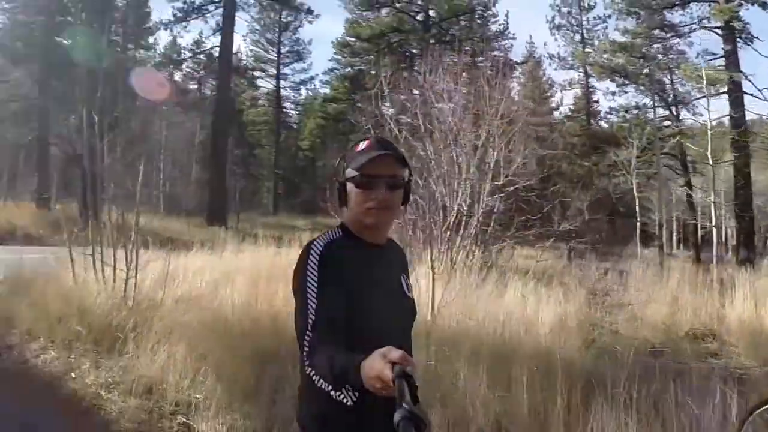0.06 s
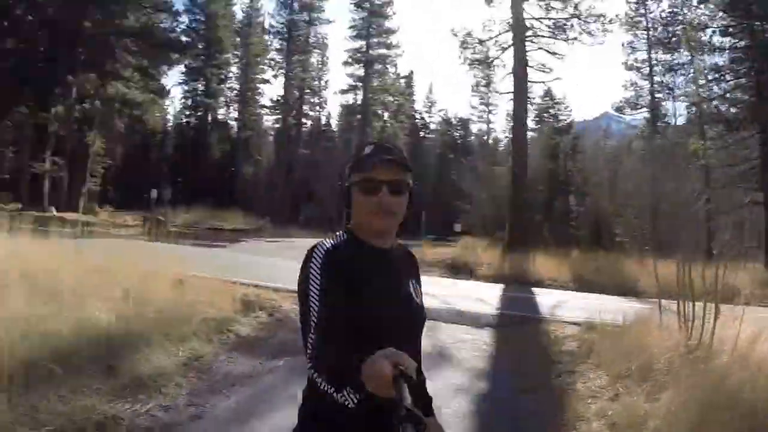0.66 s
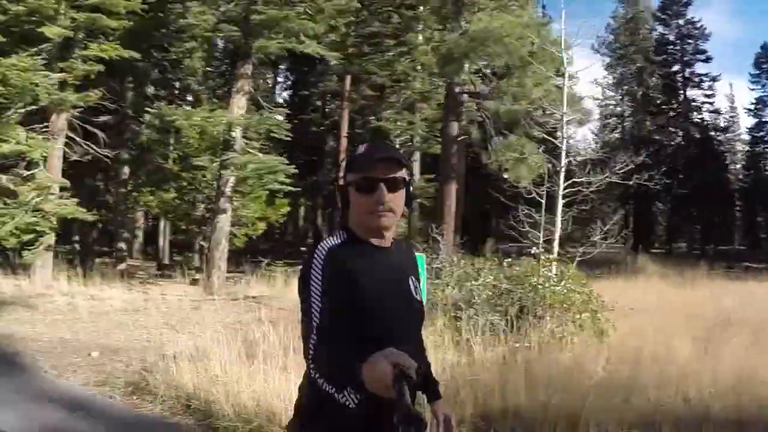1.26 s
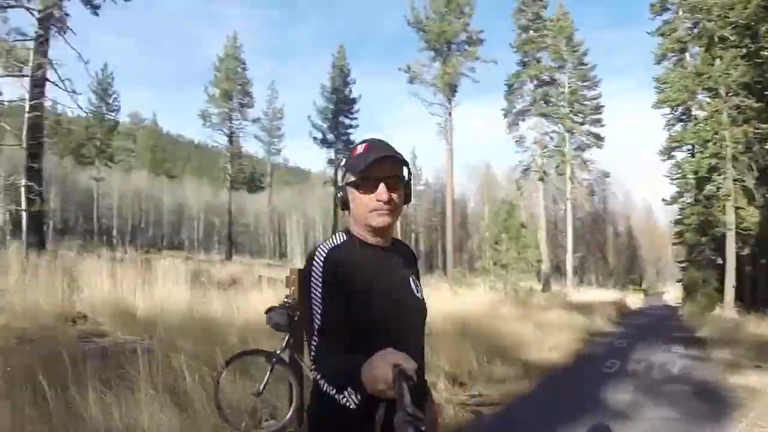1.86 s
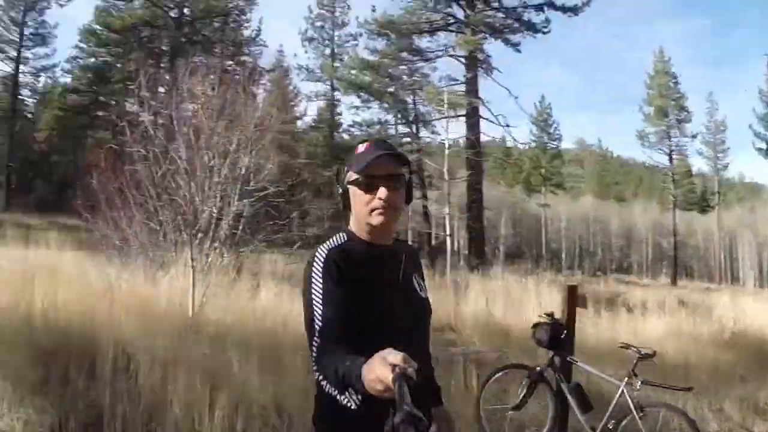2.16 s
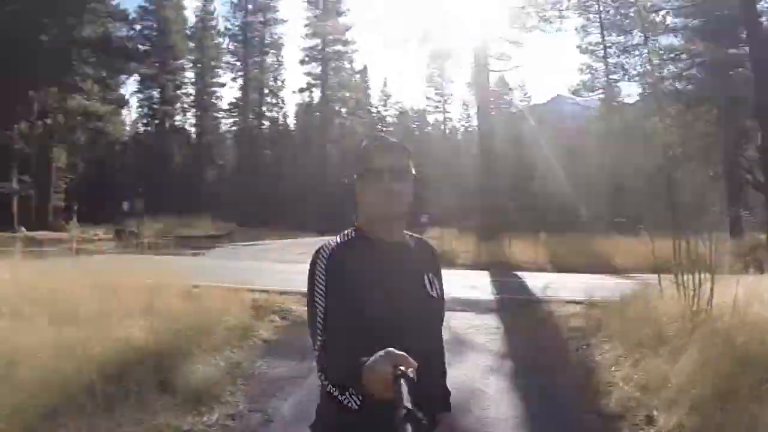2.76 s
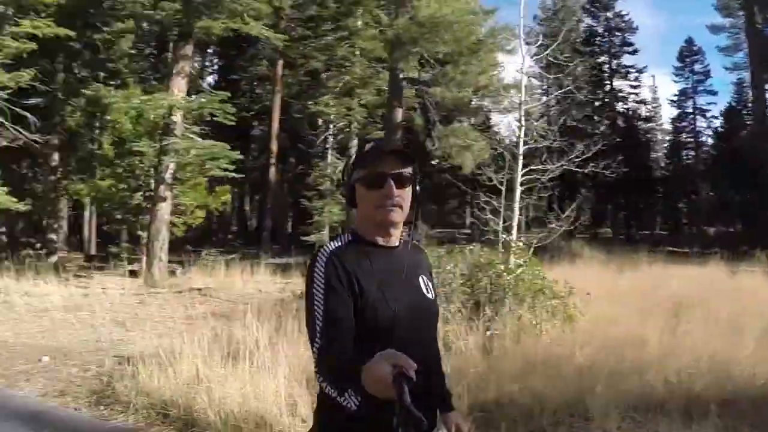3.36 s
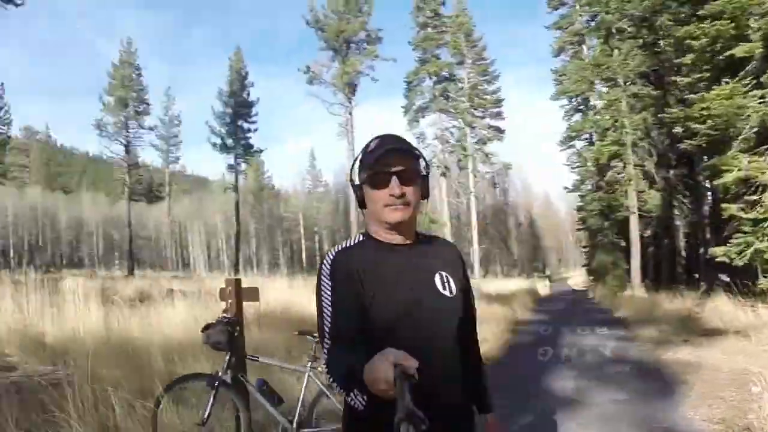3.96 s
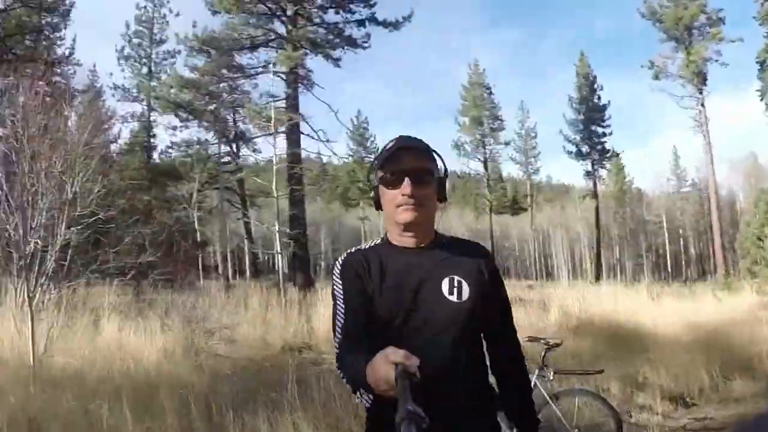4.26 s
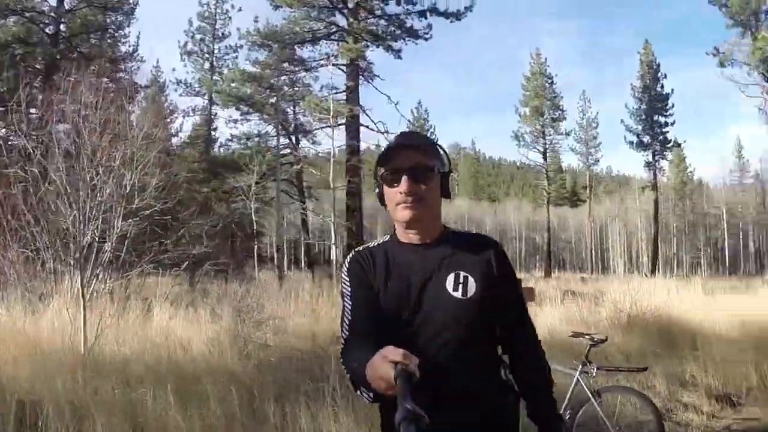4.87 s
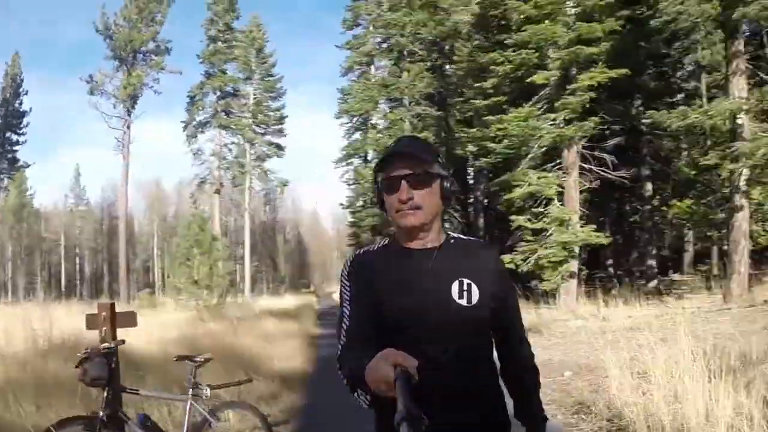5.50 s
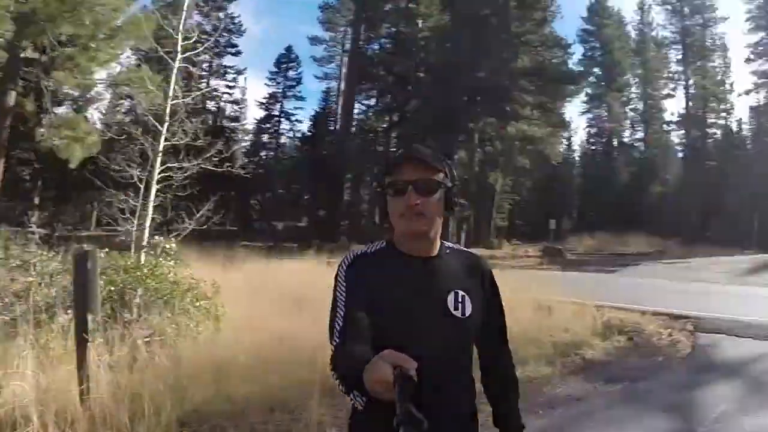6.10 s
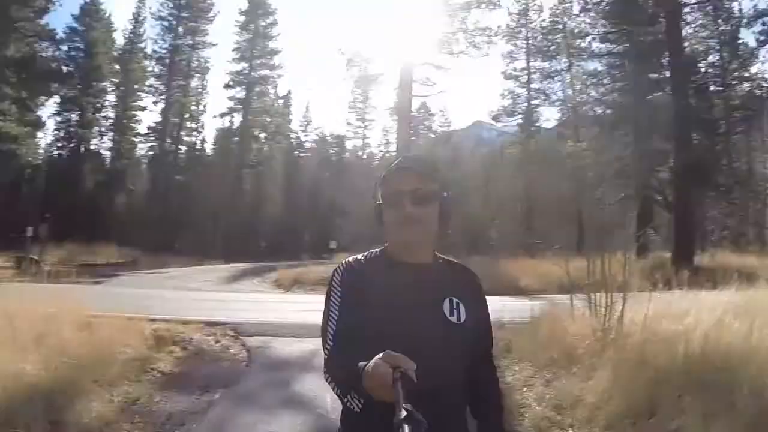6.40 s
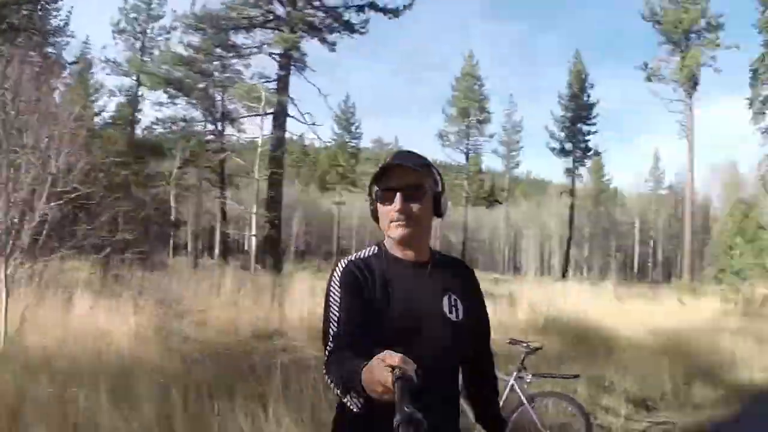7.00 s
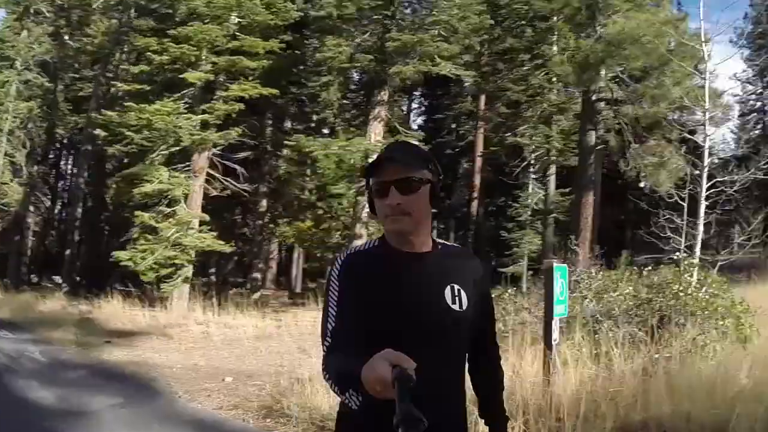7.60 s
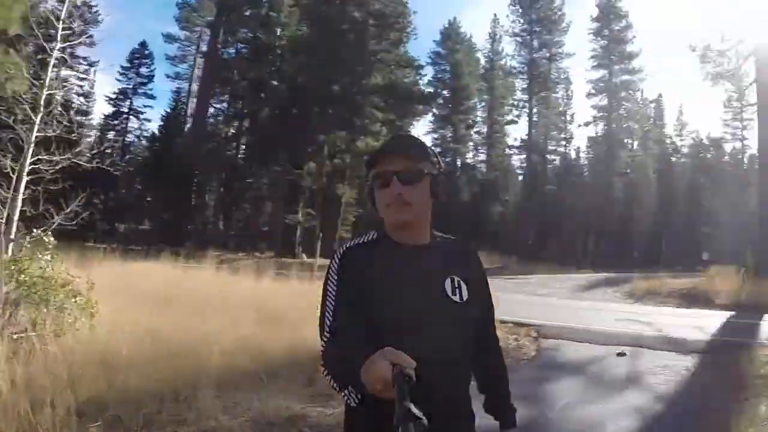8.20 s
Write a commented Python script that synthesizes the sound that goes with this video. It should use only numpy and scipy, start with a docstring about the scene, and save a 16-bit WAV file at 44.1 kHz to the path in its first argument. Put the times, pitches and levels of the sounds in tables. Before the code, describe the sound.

Quick, high chirps open a busy exchange between small songbirds in a meadow beside pine woods. Clear whistles and raspy trills join in, and the singing gradually becomes more spaced out. The microphone, carried on a pole, picks up a couple of low bumps in the first half and scattered small clicks, the sharpest near the end. A faint low rumble of air and handling runs beneath the birds.

```python
"""Quick, slurred chirps open an exchange of songbirds at the edge of a pine forest; whistles and buzzy
trills follow. Each note is a frequency-modulated tone of the syrinx, scattered into echoes by the trunks.
Behind them lies the hush of a meadow, where a camera is swung on a hand-held pole: air rumbles on its
microphones, the pole and mount thump and click in damped modes, and the electronics whine faintly."""
import sys
import numpy as np
from scipy import signal
from scipy.fft import rfft, irfft, next_fast_len
from scipy.io import wavfile
from scipy.ndimage import uniform_filter1d, map_coordinates

SR = 44100
rng = np.random.default_rng(int(sys.argv[2]) if len(sys.argv) > 2 else 0)


def wav_out(sig):
    """Save sig, one row per channel (or a flat mono array), as 16-bit PCM at SR to the path in sys.argv[1]."""
    wavfile.write(sys.argv[1], SR, np.round(np.clip(np.atleast_2d(sig).T, -1, 1) * 32767).astype(np.int16))


N = 363825


def amp(db):
    """Decibels to gain."""
    return 10 ** (np.asarray(db) / 20)


def along(points, hz):
    """Interpolate (Hz, value) points on a log frequency axis."""
    f, v = np.transpose(points)
    return np.interp(np.log(hz + 1), np.log(f + 1), v)


def wobble(t, rate):
    """A smooth random curve with rate knots a second."""
    knots = (t - t[0]) * rate
    return map_coordinates(rng.standard_normal(int(knots[-1]) + 4), [knots + 1])


def filtered(x, response):
    """Multiply the spectrum of x by response(hz)."""
    n = x.shape[-1]
    m = next_fast_len(n + 8192)
    return irfft(rfft(x, m) * response(np.fft.rfftfreq(m, 1 / SR)), m)[..., :n]


def noise(spectrum, shape):
    """Coloured noise of rms 1."""
    x = filtered(rng.standard_normal(shape), lambda hz: amp(along(spectrum, hz)))
    return x / np.sqrt(np.mean(x ** 2) + 1e-20)


def add(track, start_s, sound):
    """Mix a sound into the track."""
    start = max(round(start_s * SR), 0)
    part = track[..., start:start + sound.shape[-1]]
    part += sound[..., :part.shape[-1]]


def ring(modes, t):
    """Free vibration: a sum of exponentially damped modes."""
    return sum(amp(db - 60 * t / t60) * np.sin(2 * np.pi * hz * t) for hz, db, t60 in modes)


# Spectrum of the hush: frequency_hz, density_db
HUSH_SPECTRUM = [(100, 7.5), (400, -1), (700, -4.5), (1100, -6.5), (2500, -7.5), (5000, -15), (8000, -20.5),
                 (12000, -26), (13500, -28.5), (15000, -33)]
# Likeness of left and right: frequency_hz, coherence
HUSH_COHERENCE = [(200, .9), (500, .85), (1200, .62), (10000, .6)]
def meadow(level_db=-56.5):
    """Distant trees make an even hush, less coherent between the channels at short wavelengths."""
    def mid_side_gains(hz):
        angle = np.arccos(along(HUSH_COHERENCE, hz)) / 2
        return np.array([np.cos(angle), np.sin(angle)])
    mid, side = filtered(noise(HUSH_SPECTRUM, (2, N)), mid_side_gains)
    return amp(level_db) * np.array([mid + side, mid - side])


def whine(t, pitch_hz=10657, level_db=-78, pictures_per_s=24):
    """Amplitude modulation: the tone of the camera's electronics pulses once per picture."""
    pulse = np.sin(np.pi * pictures_per_s * t) ** 2
    return amp(level_db) * pulse * np.sin(2 * np.pi * pitch_hz * t)


# Spectrum of the pole's sway: frequency_hz, density_db
SWAY_SPECTRUM = [(10, -13), (20, 5), (27, 14), (36, -13.5), (60, -44.5), (150, -120)]
# Strength of the sway: time_s, level_db
SWAY_LEVELS = [(0.0, -71), (0.04, -51), (0.46, -33.5), (0.73, -46), (2.41, -40.5), (2.76, -49.5),
               (3.06, -33), (3.21, -46), (3.65, -33.5), (3.9, -57.5), (4.13, -40.5), (5.01, -45.5),
               (5.28, -33), (5.4, -50), (6.78, -40.5), (7.17, -49.5), (7.21, -36.5), (8.25, -41.5)]
def pole_sway(t, gain_db=-1):
    """Low-frequency vibration: the swaying pole gives a narrow band of noise at the edge of hearing."""
    sway = noise(SWAY_SPECTRUM, N)
    local_rms = np.sqrt(np.abs(uniform_filter1d(sway ** 2, size=10000)) + 1e-6)
    return amp(gain_db + np.interp(t, *np.transpose(SWAY_LEVELS))) * sway / local_rms


# Spectrum of the wind: frequency_hz, density_db
WIND_SPECTRUM = [(20, -24), (35, -3), (48, 2.5), (70, -9), (110, -25), (200, -46), (500, -120)]
def wind(t, level_db=-50, gust_db=2.0):
    """Turbulence: gusts of fluctuating pressure buffet the microphones."""
    return amp(level_db + gust_db * wobble(t, 5)) * noise(WIND_SPECTRUM, N)


# Strength of the handling: time_s, level_db
GRIP_LEVELS = [(0.0, -62.5), (0.39, -53), (0.5, -59), (1.22, -67), (1.79, -51.5), (1.88, -55.5),
               (2.73, -65.5), (3.4, -62.5), (3.54, -60.5), (4.13, -56), (4.57, -61.5), (5.58, -63),
               (5.72, -58.5), (7.7, -61.5), (7.86, -64), (8.25, -76)]
# Resonances of the case: frequency_hz, density_db
CASE_SPECTRUM = [(50, -2.5), (100, 4), (150, 1.5), (195, -1.5), (250, 6), (300, -4), (360, -20), (600, -52),
                 (1200, -120)]
def grip_rumble(t, gain_db=1, fidget_db=2.0):
    """Structure-borne sound: the grip rumbles through the hollow case."""
    level_db = gain_db + np.interp(t, *np.transpose(GRIP_LEVELS)) + fidget_db * wobble(t, 6.1)
    return amp(level_db) * noise(CASE_SPECTRUM, N)


# Soft blows to the pole: start_s, level_db, cutoff_hz
POLE_THUMPS = [(1.7527, -13, 231.6), (2.151, -36.5, 305), (3.281, -33.5, 310), (3.972, -9, 277),
               (4.292, -39.5, 303), (5.71, -41, 306)]
# Modes of the pole: pitch_hz, level_db, t60_s
POLE_MODES = [(56.9, -16, 0.24), (104, -14, 0.09), (156, -12.5, .13), (190, -5, 0.037), (239, -1.5, 0.072),
              (266, -14.5, 0.1)]
def pole_thumps(attack_s=0.0008):
    """Impacts excite the pole's modes; the soft hand acts as a low-pass filter."""
    track, t = np.zeros((2, N)), np.arange(SR // 3) / SR
    for start_s, db, cutoff_hz in POLE_THUMPS:
        hand = signal.butter(7, cutoff_hz, fs=SR, output="sos")
        thump = amp(db) * (1 - np.exp(-t / attack_s)) * ring(POLE_MODES, t)
        add(track, start_s, signal.sosfilt(hand, thump))
    return track


# Taps of the camera mount: start_s, ring_db, snap_db, ring_speed_ratio, rise_s
MOUNT_CLICKS = [(0.436, -53.5, -52, 1, .002), (1.754, -48, -66, 0.88, 0.00095),
                (2.428, -55, -33.5, 0.73, 0.0012), (3.549, -52, -62, 0.88, 0.0015),
                (3.972, -38.5, -53, 0.83, 0.0003), (5.7, -41, -36, 1, 0.00065),
                (5.828, -70, -39.5, 1.4, .001), (5.894, -75, -45, 0.9, 0.0012),
                (7.433, -36.5, -26.5, 0.987, 0.00089), (7.559, -38, -53, 1, 0.01),
                (7.72, -41, -52, 0.94, 0.011), (7.779, -54.5, -54, 1.8, 0.0005)]
# Modes of the mount at ratio 1: pitch_hz, level_db, t60_s
MOUNT_MODES = [(635, -7, 0.036), (1445, -4, 0.066), (1556, 12, 0.03), (1780, -4, 0.064), (2330, 9.5, 0.02),
               (3500, -9, 0.036)]
# Spectrum of a snap: frequency_hz, density_db
SNAP_SPECTRUM = [(300, 9), (1200, -21), (2300, 22), (4400, 12), (5400, -3.5), (6400, 3.5), (8000, -59),
                 (15000, -63)]
def mount_clicks(snap_t60_s=0.039):
    """Impact transients: the plastic mount gives a broadband snap and rings briefly."""
    track, t = np.zeros((2, N)), np.arange(SR // 3) / SR
    for start_s, ring_db, snap_db, ratio, rise_s in MOUNT_CLICKS:
        snap = amp(snap_db - 60 * t / snap_t60_s) * noise(SNAP_SPECTRUM, (2, len(t)))
        ringing = amp(ring_db) * ring(MOUNT_MODES, ratio * t)
        add(track, start_s, (1 - np.exp(-t / rise_s)) * (ringing + snap))
    return track


# Reverberation time of the forest: frequency_hz, t60_s
FOREST_DECAY = [(1000, 2.07), (2500, 1.084), (4000, 0.92), (7000, 0.82), (12000, 0.17)]
def forest(song, build_s=0.0051, near_db=5, near_s=0.0094, coherence=0.065):
    """Multiple scattering: strong echoes from the nearest trunks, then a long diffuse tail."""
    hz, t, spectra = signal.stft(rng.standard_normal((3, SR)), SR, nperseg=256)
    decay_db = near_db * np.exp(-t / near_s) - 60 * t / along(FOREST_DECAY, hz)[:, None]
    envelope = (1 - np.exp(-t / build_s)) * amp(decay_db)
    tails = signal.istft(spectra * envelope, SR, nperseg=256)[1]
    response = np.sqrt(coherence) * tails[2] + np.sqrt(1 - coherence) * tails[:2]
    song_band_gain = np.sqrt(np.mean(np.abs(rfft(response, SR)[:, 2000:4500]) ** 2))
    return signal.fftconvolve(song, response / song_band_gain, axes=1)[:, :N]


# Perch and voice of each phrase: start_s, left_over_right_db, echo_db, octave_db, hoarseness (0 is clear)
SONG_PHRASES = [ (0.0, 5.5, -2, -34.5, 0.22), (0.5, -9, -2.5, -32, 0.3), (1.0, -6.5, 2.5, -29.5, 0.26),
                (1.3, 5.5, -0.5, -36.5, 0.22), (1.8, 9, -2.5, -34.5, 0.11), (2.2, 7, -2.5, -35, 0.22),
                (3.0, 5.5, -2, -29, 0.16), (3.24, 19, -2, -33.5, .3), (3.4, 5.5, -3.5, -39, 0.27),
                (3.8, 27, -4, -21.5, 0.54), (4.3, -5.5, -1.5, -37.5, 0.14), (4.7, 31, -3.5, -27, 0.32),
                (5.0, 22, -3, -30.5, 1.15), (5.4, 5, -3.5, -32, 0.8), (5.58, 25, -4.5, -30, 0.98),
                (6.2, 30, -3.5, -28, 0.44), (6.55, 22, -3.5, -28, 1), (6.95, -7.5, -2, -39, 0.17),
                (7.6, 22, -7.5, -34, 0.3), (8.1, -6, -8, -55, 0.2), ]
def phrase(time_s):
    """The perch and voice of the latest phrase to have begun."""
    return SONG_PHRASES[sum(time_s >= row[0] for row in SONG_PHRASES[1:])][1:]


def syrinx(start_s, t, hz, jitter=0.03, shimmer_db=4, rasp_db=-40, third_db=-45):
    """A nearly pure oscillation; hoarseness is random modulation of its pitch and level."""
    _, _, octave_db, hoarse = phrase(start_s)
    phase = 2 * np.pi * np.cumsum(hz * (1 + jitter * hoarse * wobble(t, 697.3))) / SR
    ragged = min(.5 + 5 * hoarse, 1.7) * wobble(t, 800)
    overtones = amp(octave_db) * np.sin(2 * phase + ragged) + amp(third_db) * np.sin(3 * phase + ragged)
    rasp = amp(rasp_db) * wobble(t, 3200) * np.sin(3 / 2 * phase)  # faint hiss above the note
    shimmer = amp(shimmer_db * hoarse * wobble(t, 194))
    return np.sqrt(2) * shimmer * (np.sin(phase) + overtones + rasp)


def swell(length_s, accent, rise_db, fall_db, edge_s=.006):
    """A note's time and envelope: it rises to the accent, a fraction of its length, then falls."""
    t = np.arange(-edge_s / 2, length_s + edge_s / 2, 1 / SR)
    from_accent = np.interp(t / length_s, [0, np.clip(accent, .02, .98), 1], [-1, 0, 1])
    below_db = np.where(from_accent < 0, rise_db, fall_db) * np.abs(from_accent) ** 1.38
    edge = np.clip(np.minimum(t - t[0], t[-1] - t) / edge_s, 0, 1)
    return t, amp(-below_db) * np.sin(np.pi / 2 * edge) ** 2


# Held notes: start_s, length_s, start_hz, end_hz, level_db, accent_fraction, rise_db, scoop_hz, scoop_s
WHISTLE_NOTES = [ (0.545, 0.076, 1770, 1755, -52, 0.7, 5, 76, 0.016),
                 (0.583, .035, 2664, 2714, -50, .2, 6, -200, 0.0058),
                 (0.792, 0.092, 2336, 2194, -30, 1, 13, 637.5, 0.031),
                 (1.112, 0.073, 2680, 2990, -39.5, 0.9, 1, 64, 0.011),
                 (3.174, 0.1, 4770, 5140, -46.5, 0, 1, 594, 0.0056),
                 (3.175, 0.07, 7020, 7630, -55, 0, 3, 897, 0.0062),
                 (3.272, .135, 6330, 6450, -42, 0.46, -2, 1097, 0.02),
                 (3.268, 0.17, 3221, 3210, -29, 0.1, 15, 684.5, .024),
                 (3.915, 0.058, 2352, 2540, -38.5, 0.1, 7, 207, 0.0046),
                 (4.361, .160, 2389, 2253, -27.5, 0.33, 12, 755, .008),
                 (5.453, 0.046, 2800, 3890, -56.5, 0.3, 1, 50, 0.014),
                 (6.288, 0.024, 2750, 2500, -42, 0.9, 7, 146, 0.0056),
                 (7.011, 0.26, 2610, 3014, -30, 0.66, 1.5, 946, .009),
                 (8.152, 0.077, 1777, 1710, -52, 0.3, 8, 52, 0.017), ]
def whistles(gain_db=1.0, scoop_db_per_hz=0.0259):
    """Exponential relaxation: each whistle scoops onto a drifting pitch, weaker while it is flat."""
    for start_s, length_s, start_hz, end_hz, db, accent, rise_db, scoop_hz, scoop_s in WHISTLE_NOTES:
        t, envelope = swell(length_s, accent, rise_db, fall_db=8)
        flat_hz = scoop_hz * np.exp(-np.maximum(t, 0) / scoop_s)
        hz = np.interp(t, [0, length_s], [start_hz, end_hz]) - flat_hz
        level_db = gain_db + db - scoop_db_per_hz * flat_hz
        yield start_s, t, amp(level_db) * envelope * syrinx(start_s, t, hz)


# Buzzy notes: start_s, length_s, start_hz, end_hz, level_db, accent_fraction, rise_db, swing_hz, rate_hz
TRILL_NOTES = [ (0.613, 0.044, 1900, 1680, -51, .15, 2, 343, 61),
               (0.687, 0.066, 1940, 2060, -52.5, 0.4, 3, 246, 51),
               (0.784, 0.047, 2930, 4230, -51, 0.5, 3, 350, 140),
               (0.883, 0.052, 2130, 2192, -37, 0.4, 8, 392, 74),
               (0.913, 0.053, 3090, 4240, -49.5, .5, 1, 350, 120),
               (1.022, .045, 3184, 3930, -45.5, 0.1, 2, 322, 160),
               (1.535, .100, 6300, 6310, -37.5, 0.35, 6, 864, 62),
               (2.133, 0.061, 2630, 1993, -31.5, 0.03, 0, 420, 89),
               (2.414, 0.019, 2410, 2480, -30, .5, 12, 368, 114),
               (2.609, .036, 1985, 1740, -45, 0.4, 6, 323, 90),
               (2.654, 0.079, 2618, 2190, -31, 0.04, 2, 420, 77),
               (2.813, 0.061, 5170, 3890, -39.5, 0.58, 14, 650, 130),
               (2.873, 0.095, 3667, 3250, -32.5, 0.9, 7.5, 410, 131),
               (3.038, 0.073, 2550, 2616, -32, 0.87, 3.5, 472, 68),
               (3.256, 0.15, 3886, 3624, -35, 0.14, 16, 290, 215),
               (3.410, 0.067, 3320, 2608, -30, 0.84, 8.5, 360, 150),
               (3.474, 0.099, 2644, 2269, -31, 0.2, -1, 296, 152),
               (3.995, .070, 2310, 1854, -40, 0.32, 4, 195, 110),
               (4.515, 0.064, 2306, 2242, -38, 0.2, 6, 201, 108),
               (4.715, 0.07, 2840, 2652, -34, 0.4, 9, 360, 82),
               (5.02, .140, 3250, 2613, -34.5, 0.4, 4.5, 510, 79),
               (5.591, 0.1, 3126, 2846, -36, 0.7, 4.5, 604, 82),
               (6.314, 0.0582, 3078, 2864, -33.5, 0.4, 0, 338, 267),
               (6.606, .145, 3070, 2782, -31.5, 0.48, 2.5, 494, 60),
               (7.682, 0.022, 2650, 2670, -46.5, .4, 3, 357, 94),
               (8.217, .040, 1800, 1800, -57, 0.7, 5, 250, 63), ]
def trills(gain_db=1.2, cusp=0.06, downstroke_db=4.5, second_db=-1, second_swing=0.35, drop_hz=140):
    """Fast frequency modulation; in hoarse trills both sides of the syrinx sound at once (biphonation)."""
    for start_s, length_s, start_hz, end_hz, db, accent, rise_db, swing_hz, rate_hz in TRILL_NOTES:
        t, envelope = swell(length_s, accent, rise_db, fall_db=9, edge_s=.013)
        centre_hz = np.interp(t, [0, length_s], [start_hz, end_hz])
        hoarse = min(phrase(start_s)[3], 1)
        depth = np.tanh(swing_hz / 200)
        cycle = 2 * np.pi * np.cumsum(rate_hz * (1 + 0.105 * hoarse * wobble(t, 60))) / SR
        first_hz = centre_hz + swing_hz * (np.cos(cycle) + cusp * np.cos(2 * cycle))  # pointed tops
        second_hz = centre_hz - drop_hz - second_swing * swing_hz * np.cos(cycle)
        first = amp(depth * downstroke_db * np.sin(cycle)) * syrinx(start_s, t, first_hz)
        second = amp(second_db) * syrinx(start_s, t, second_hz)
        share = .9 * depth * hoarse
        voices = np.sqrt(1 - share ** 2) * first + share * second
        yield start_s, t, amp(gain_db + db) * envelope * voices


# Slurs: start_s, first_glide_s, second_glide_s, start_hz, turn_hz, end_hz, level_db, accent_fraction
CHIRP_NOTES = [ (0.000, 0.01, 0.0025, 3240, 5810, 4100, -24.5, 0),
               (0.01, 0.013, .010, 4180, 3860, 2840, -26, 0.38),
               (0.029, 0.0089, .022, 3174, 4340, 4500, -25.5, 0.13),
               (0.099, .020, 0.0099, 3460, 2855, 2300, -30.5, 0.66),
               (0.143, 0.017, .011, 4010, 4730, 3320, -27.5, 1),
               (0.174, 0.0087, 0.006, 3580, 5830, 3970, -37.5, 0),
               (0.185, 0.013, 0.02, 3860, 3120, 2226, -27.5, 0.17),
               (0.665, .012, 0.016, 2810, 2210, 1840, -47, 0.7),
               (1.022, .013, 0.027, 2745, 2257, 1747, -30.5, 0.1),
               (1.083, 0.013, 0.012, 3946, 3500, 2780, -43, 0.9),
               (1.175, 0.022, 0.035, 2894, 3367, 3540, -36.5, 0.13),
               (1.212, 0.011, 0.024, 5140, 3960, 3860, -39, .35),
               (1.317, 0.013, 0.069, 3564, 2883, 2105, -33, 0),
               (1.331, 0.013, 0.022, 2870, 4160, 2535, -32.5, 0.82),
               (1.437, 0.0082, 0.011, 3820, 3990, 3290, -29, 0.7),
               (1.455, .014, 0.011, 3360, 2974, 2410, -30.5, 0),
               (1.496, .010, 0.02, 2922, 4450, 2636, -28.5, 0.5),
               (1.586, 0.014, .012, 3430, 3480, 4040, -34, 1),
               (1.610, 0.0097, 0.022, 4310, 5090, 1940, -28, 0.56),
               (1.696, 0.014, .007, 4450, 3860, 5770, -31.5, 0.8),
               (1.724, 0.018, 0.0089, 4290, 3920, 3330, -28, 0.87),
               (1.826, .011, 0.0082, 3743, 4270, 3500, -25, .55),
               (1.846, .014, 0.02, 3488, 3520, 4200, -23.5, 0.7),
               (1.828, .015, .012, 5700, 6480, 5040, -43.5, 0.8),
               (1.871, .011, 0.019, 2720, 4350, 3415, -27, 0.33),
               (1.89, 0.011, 0.015, 3425, 3100, 2940, -25.5, 0.27),
               (1.956, 0.013, 0.0088, 3246, 2497, 3210, -26, 0.9),
               (1.976, 0.0055, .015, 2930, 3120, 2860, -24.5, 0.6),
               (2.049, 0.019, 0.041, 3060, 4014, 3176, -26.5, 0.96),
               (2.104, .016, 0.018, 3260, 2664, 2030, -24.5, 0.26),
               (2.085, 0.0071, 0.0056, 2620, 2230, 1527, -34, 0.52),
               (2.219, 0.04, 0.019, 3170, 3650, 2930, -26.5, 0.58),
               (2.272, .016, .011, 2960, 2516, 2100, -24, 0.12),
               (2.380, .014, 0.03, 3595, 3300, 2060, -25.5, 0.64),
               (2.434, 0.021, 0.0077, 2414, 3225, 4350, -27.5, 0.74),
               (2.457, .007, 0.0068, 4330, 3790, 3200, -26.5, 1),
               (2.521, 0.014, .024, 2414, 2933, 1677, -29, 0.3),
               (2.575, 0.017, 0.017, 2298, 2584, 2440, -24.5, 0.3),
               (2.655, .024, 0.049, 2692, 3068, 2058, -24.5, 0.7),
               (3.108, .012, 0.0139, 2960, 2535, 1890, -27, 0.56),
               (3.134, 0.013, 0.02, 1866, 2146, 2130, -36, .7),
               (3.885, 0.024, 0.023, 2400, 1916, 2290, -49, 0.1),
               (4.730, 0.04, 0.023, 3525, 2924, 3393, -27.5, .45),
               (4.790, 0.023, 0.03, 3275, 3640, 2410, -27, 0.1),
               (4.85, 0.011, 0.024, 1886, 3200, 1950, -29, 0.58),
               (5.495, 0.033, 0.055, 1840, 2230, 2560, -47, 0.8),
               (5.545, 0.0175, 0.0185, 3274, 3440, 3610, -39, .6),
               (6.314, 0.0105, .026, 3402, 3202, 2720, -31, 0.5),
               (6.360, 0.028, 0.039, 2860, 3670, 2740, -43, 1),
               (6.428, 0.014, 0.02, 1880, 3170, 2120, -31.5, 0.87),
               (7.632, .025, .016, 3430, 3470, 2040, -53.5, 0.2),
               (7.672, 0.0039, 0.014, 2320, 1970, 2950, -46, 0.9), ]
def chirps(gain_db=1.0, waver_db=1, upstroke_db=2, upstroke_hz_per_s=120000):
    """Frequency sweeps: two glides joined by a rounded turn, weaker while the pitch climbs."""
    for start_s, first_s, second_s, start_hz, turn_hz, end_hz, db, accent in CHIRP_NOTES:
        t, envelope = swell(first_s + second_s, accent, rise_db=7, fall_db=11.5)
        glides_hz = np.interp(t, [0, first_s, first_s + second_s], [start_hz, turn_hz, end_hz])
        hz = uniform_filter1d(glides_hz, size=260)
        climb = np.clip(np.gradient(hz, t) / upstroke_hz_per_s, 0, 1)
        level_db = gain_db + db - upstroke_db * climb + waver_db * wobble(t, 150)
        yield start_s, t, amp(level_db) * envelope * syrinx(start_s, t, hz)


def birds(left_lag_s=.00003, echo_pan=0.049):
    """Direct and diffuse sound: a level difference places each perch; the echo is spread more evenly."""
    direct, scattered = np.zeros((2, N)), np.zeros((2, N))
    sides = np.array([[1], [-1]]) / 2
    place = lambda db: amp(sides * db) / np.sqrt(np.mean(amp(sides * db) ** 2, axis=0))
    for start_s, t, note in [*chirps(), *whistles(), *trills()]:
        pan_db, echo_db, _, _ = phrase(start_s)
        add(direct, start_s + t[0], note * place(pan_db))
        add(scattered, start_s + t[0], note * amp(echo_db) * place(echo_pan * pan_db))
    direct = filtered(direct, lambda hz: np.exp(-2j * np.pi * hz * sides * left_lag_s))
    return direct + forest(scattered)


def scene():
    """Superposition: birdsong over knocks, rumble, hush and whine."""
    t = np.arange(N) / SR
    song = birds()
    knocks = pole_thumps() + mount_clicks()
    rumble = pole_sway(t) + wind(t) + grip_rumble(t)
    return song + knocks + rumble + meadow() + whine(t)


def record(dry, cutoff_hz=15100):
    """Band limiting: the camera keeps nothing above its cutoff."""
    return filtered(dry, lambda hz: hz < cutoff_hz)


dry = scene()
out = record(dry)
wav_out(out)
```